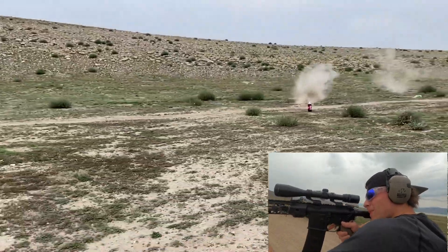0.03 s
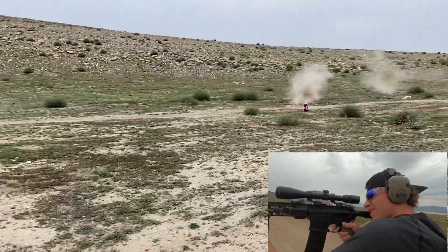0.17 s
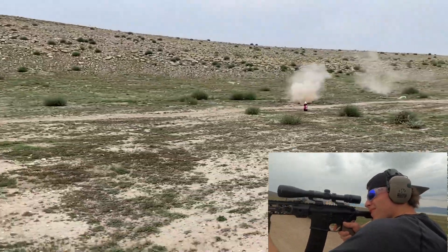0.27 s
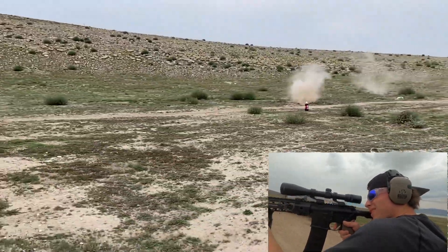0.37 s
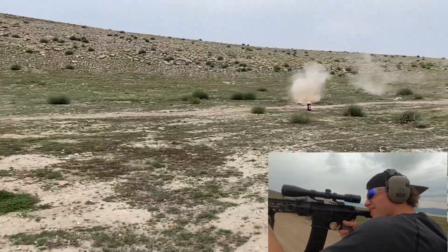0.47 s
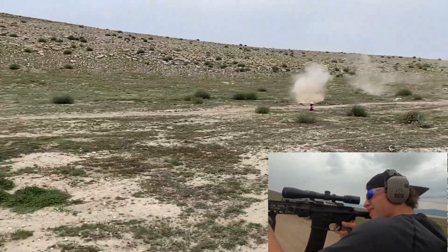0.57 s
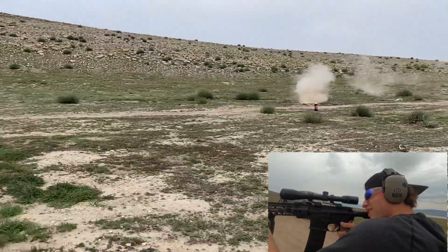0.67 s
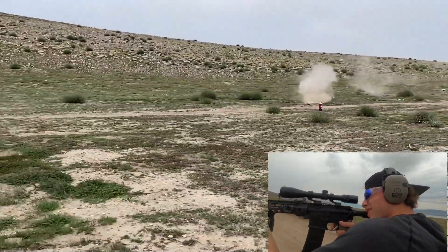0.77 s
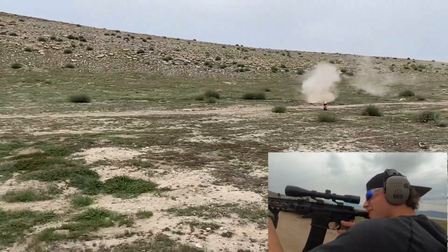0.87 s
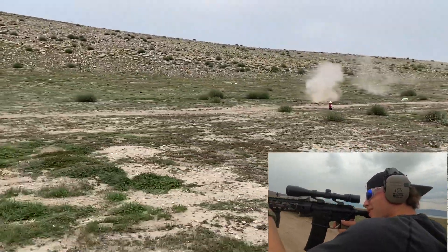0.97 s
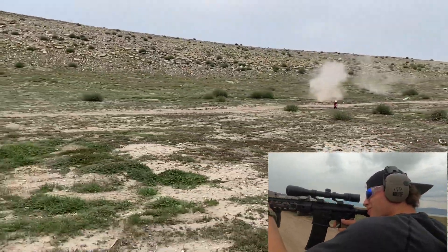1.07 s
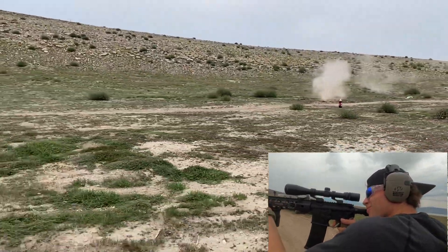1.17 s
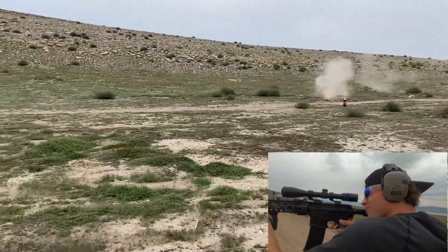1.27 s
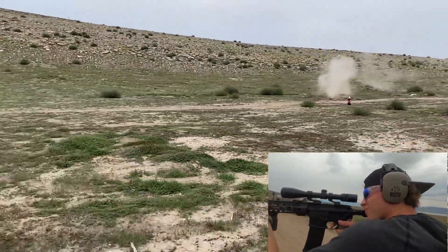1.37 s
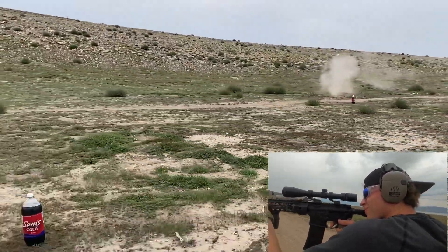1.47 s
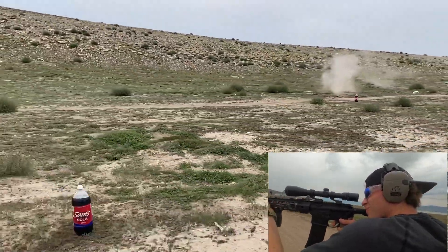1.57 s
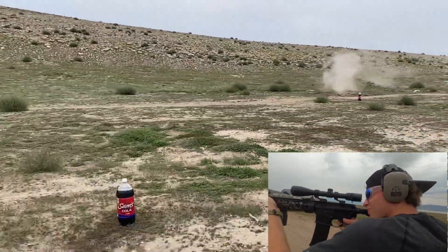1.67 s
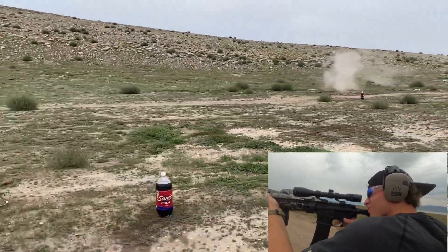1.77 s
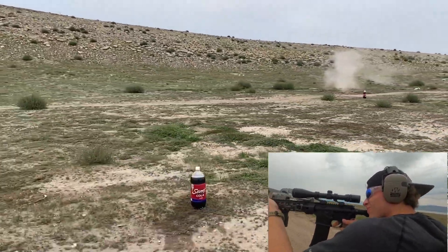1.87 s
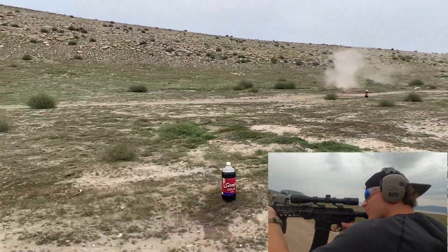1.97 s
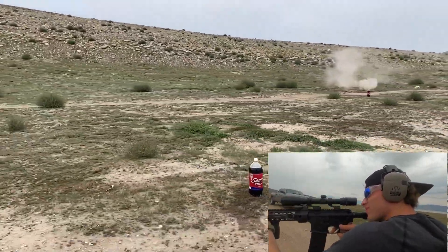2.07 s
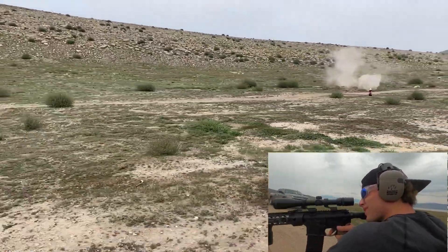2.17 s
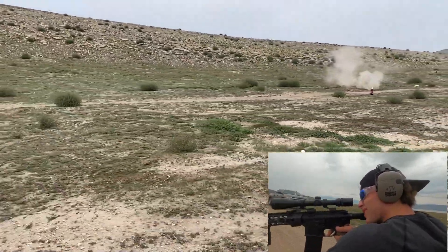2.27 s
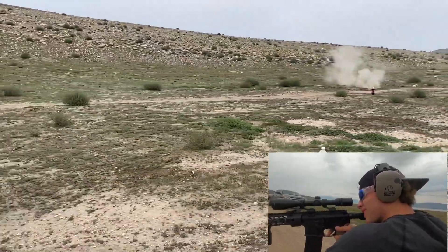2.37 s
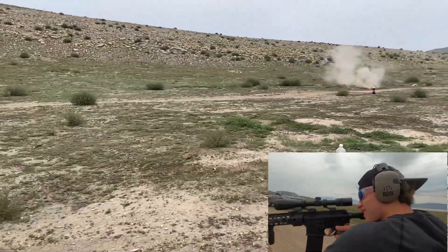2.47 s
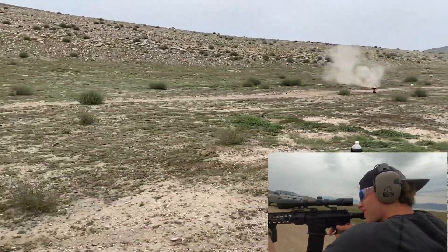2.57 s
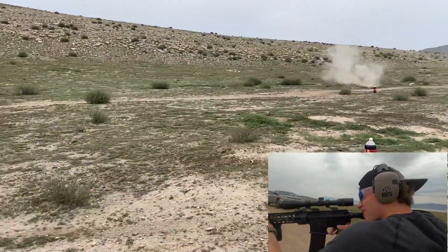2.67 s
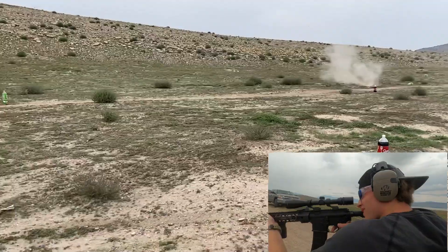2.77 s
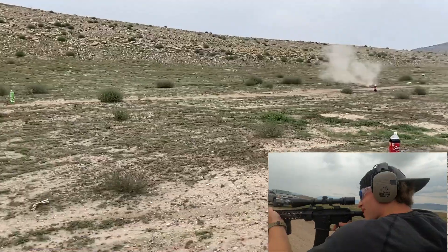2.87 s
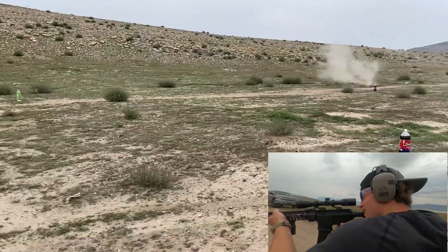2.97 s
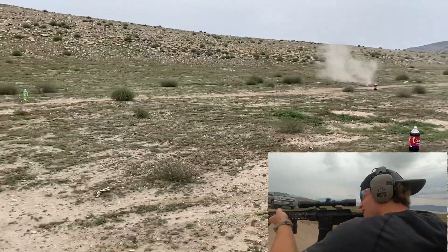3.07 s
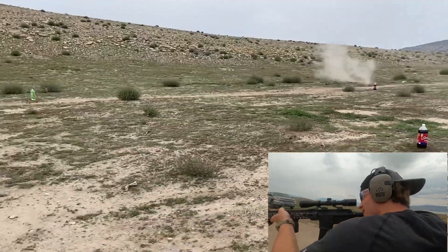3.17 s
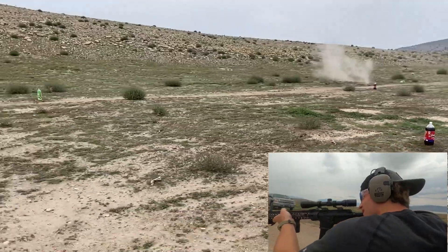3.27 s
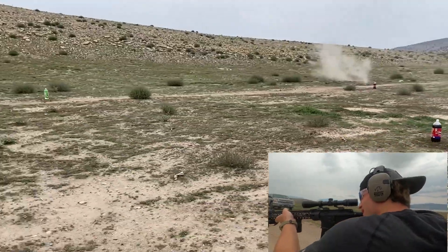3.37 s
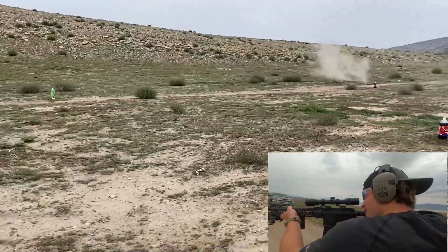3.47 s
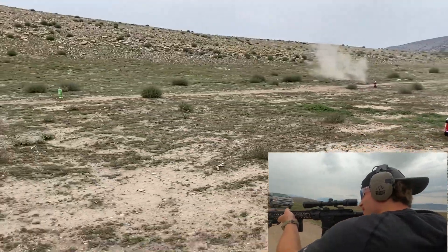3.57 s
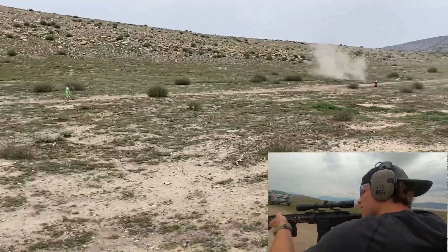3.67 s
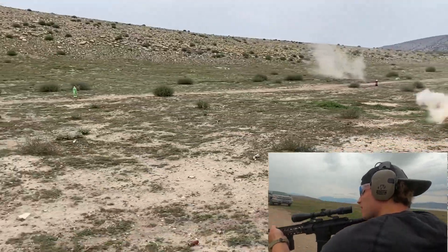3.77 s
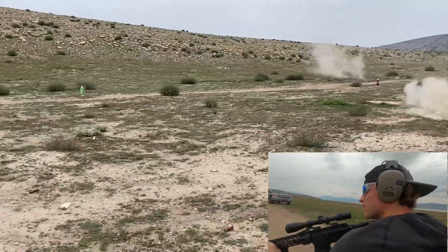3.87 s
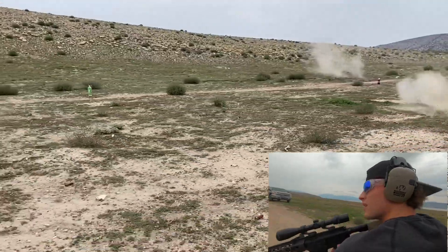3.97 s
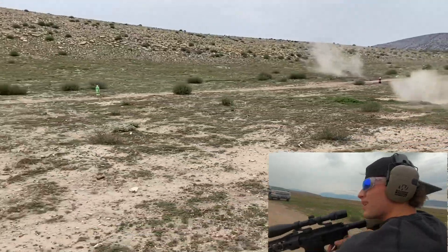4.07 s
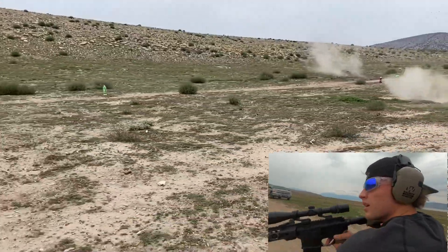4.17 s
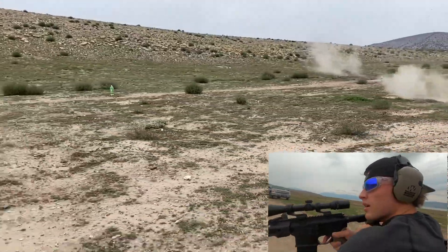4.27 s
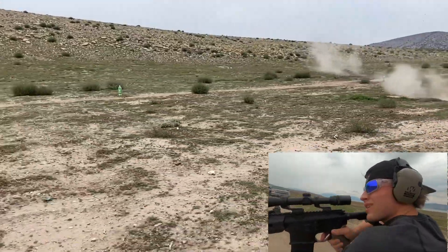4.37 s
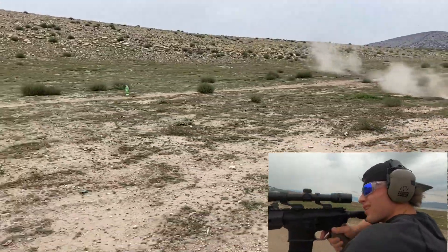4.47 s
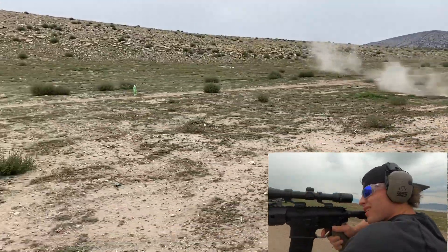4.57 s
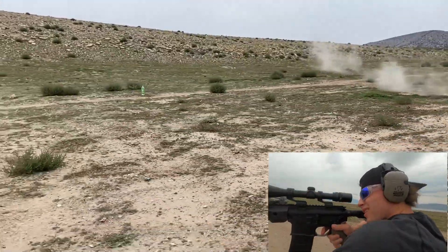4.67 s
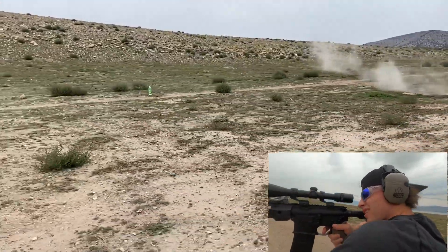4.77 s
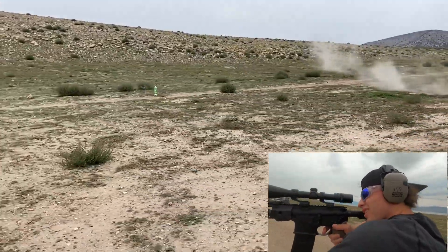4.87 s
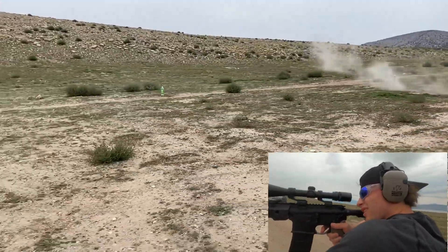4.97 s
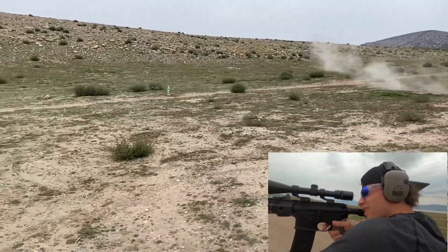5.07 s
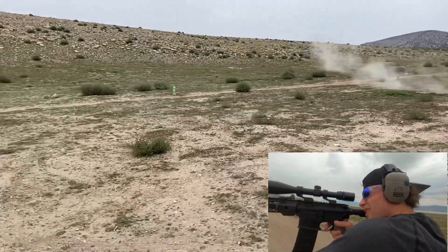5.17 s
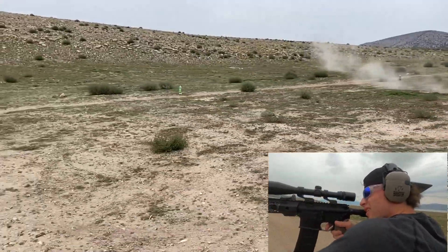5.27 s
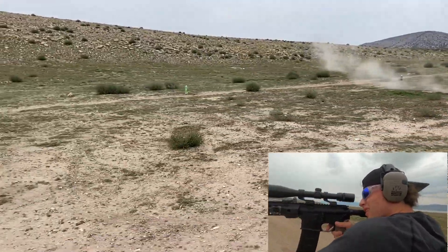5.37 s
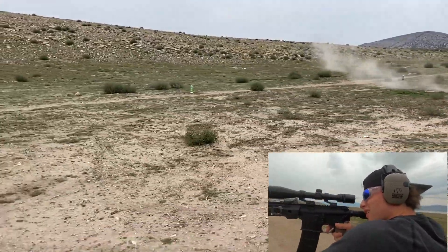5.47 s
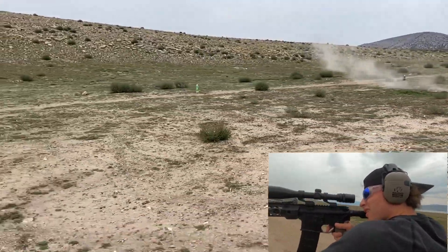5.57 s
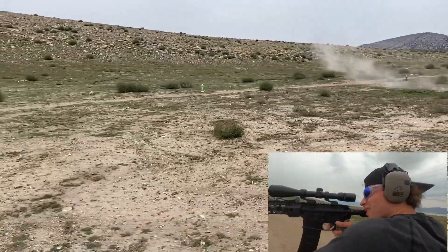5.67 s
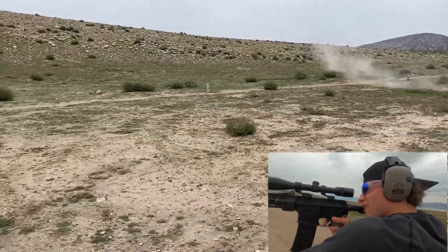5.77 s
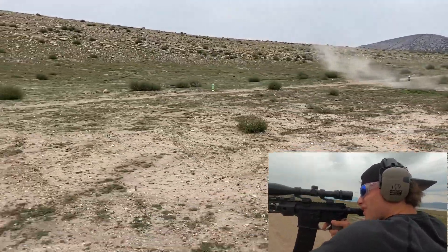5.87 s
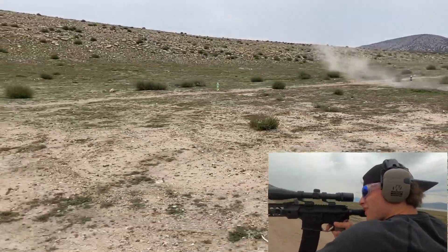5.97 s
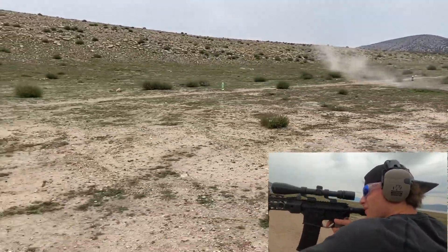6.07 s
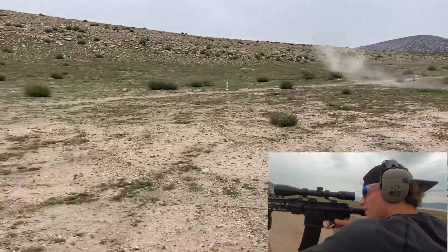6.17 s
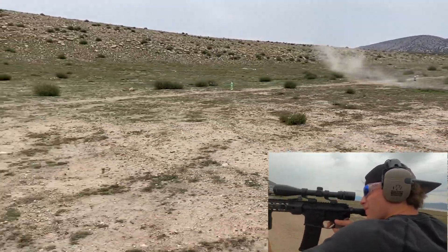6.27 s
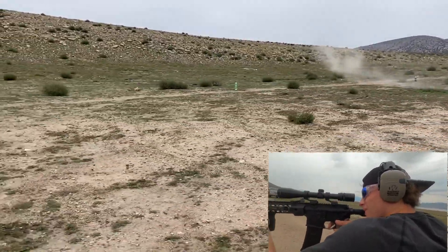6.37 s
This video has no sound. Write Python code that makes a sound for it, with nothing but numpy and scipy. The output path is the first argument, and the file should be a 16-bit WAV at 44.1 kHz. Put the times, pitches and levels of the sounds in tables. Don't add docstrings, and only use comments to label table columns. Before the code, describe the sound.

Sharp, clipped rifle blasts on an open dirt range, each answered by a dulling hillside echo, then light wind buffeting the microphone.

```python
import sys
import numpy as np
from scipy import signal
from scipy.fft import rfft, irfft, next_fast_len
from scipy.io import wavfile
from scipy.ndimage import uniform_filter1d

SR = 44100
rng = np.random.default_rng(int(sys.argv[2]) if len(sys.argv) > 2 else 0)


def dump(signal):
    limited = np.clip(np.atleast_2d(signal).T, -1, 1)
    pcm = np.round(limited * 32767).astype(np.int16)
    wavfile.write(sys.argv[1], SR, pcm)


def natural_amplitude(level_db):
    exponent = np.asarray(level_db, float) / 20
    return 10 ** exponent


N = 283651
T = np.arange(N) / SR
FFT_SIZE = next_fast_len(N)
HZ = np.fft.rfftfreq(FFT_SIZE, 1 / SR) + 1

# t/s, level/dB, first lobe/ms, lobe stretch exponent/1, t60/ms
SHOCK_FRONTS = [
    (.1520, 22, .57, .80, 10),
    (1.9919, 24, .72, .53, 8),
    (3.7534, 12, .24, .97, 8),
    (3.7590, 16, .9, .68, 11.5),
]
JET_LEVELS = [13, 10, 12, -4]

# peak delay/s, swell t60/s, level/dB, fade t60/s, tilt/(dB per octave)
GROUND = [(.004, .03, -11, .095, -.4), (.035, .086, -34.7, .8, 2.3), (.172, .469, -26.3, .459, -1.8)]
ROCK_FACE = [(0.253, 0.117, -27.6, 0.535, 5.2), (0.295, 0.371, -28.0, 1.816, 2.5)]
FAR_SLOPES = [(0.262, 0.214, -16.1, 0.269, -2.2), (0.35, 0.345, -19.3, 0.74, -5.1),
              (0.528, 0.403, -25.7, 1.316, -7.0), (0.612, 2.011, -61.7, 3.279, 7.5),
              (0.86, 0.3, -50.6, 5.572, -7.1)]
# t/s, level/dB, face delay factor/1, slope delay factor/1, near tilt/(dB per octave)
AIMS = [
    (-0.75, -1.3, 1.0, 0.985, -0.0),
    (0.152, -0.7, 1.007, 1.044, 0.4),
    (1.992, -2.2, 0.925, 0.974, 1.6),
    (3.753, -1.6, 1.003, 0.932, -0.1),
]
# t/s, level/dB, tilt/(dB per octave)
OUTCROPS = [(0.01, -37.6, -3.3), (0.315, -28.1, -4.9), (0.398, -19.6, -1.4), (0.434, -12.2, -2.9),
            (0.52, -30.8, 1.5), (0.7, -33.6, -6.3), (0.835, -35.4, -4.0), (2.135, -33.8, 2.1),
            (2.225, -36.2, 2.8), (2.258, -9.0, -6.0), (2.305, -13.9, -1.6), (2.41, -24.1, -2.6),
            (2.53, -33.3, -1.2), (2.84, -37.6, -7.6), (2.94, -47.9, -4.4), (3.92, -39.8, 1.5),
            (4.022, -8.7, -5.4), (4.075, -14.7, -1.1), (4.25, -34.5, -3.1), (4.3, -21.3, -8.1),
            (4.456, -31.0, -3.4)]
# f/Hz, level/(dB per Hz)
HILL_SPECTRUM = [(35.0, -52.0), (70.0, -23.0), (140.0, -6.6), (200.0, -4.2), (280.0, -1.8), (400.0, -3.7),
                 (600.0, -10.8), (850.0, -17.0), (1250.0, -17.2), (2000.0, -23.7), (3500.0, -28.9),
                 (7000.0, -41.7), (12000.0, -54.5), (16000.0, -62.5)]

# t/s, f/Hz, level/dB
BULLET_WHINE = [
    (2.08, 1920, -62),
    (2.14, 2045, -45),
    (2.2, 2110, -45),
    (2.42, 2345, -54),
    (2.52, 2295, -56),
    (2.7, 1990, -60),
    (2.92, 1580, -65),
    (2.97, 1510, -74),
    (3.15, 1300, -78),
]
# t/s, peak level/dB, f/Hz, t60/s
GRIT_TICKS = [(.2344, -42, 7000, .012), (.3194, -46, 7000, 0.013), (0.739, -48, 3480, 0.011),
              (.8894, -52, 4500, .012), (.9358, -50, 4500, .012), (.9637, -46, 3800, .015),
              (2.793, -45, 3970, .02), (3.9151, -45, 7000, 0.013), (3.9265, -47, 8000, .012),
              (4.2877, -37, 3970, 0.01)]
# t/s, peak
# level/dB, f/Hz, t60/s
KNOCKS_AND_MURMURS = [(.391, -14, 600, 0.045), (4.565, -46, 2500, 0.045), (1.199, -49.5, 1150, 0.03),
                      (1.359, -48, 900, 0.054), (1.629, -50.5, 1150, .03), (4.45, -48, 2800, 0.056),
                      (1.55, -45, 175, .7), (1.2, -55, 1050, 1.1), (1.55, -56, 1050, 1.1), (3.33, -60, 700, .6),
                      (4.456, -40, 795, 0.053), (5.1, -42, 394, 0.025), (5.634, -53, 650, 0.073),
                      (5.685, -47, 800, 0.045), (5.875, -42.5, 340, .05), (5.884, -50, 1030, 0.1),
                      (5.934, -58, 650, 0.04)]
# t/s, f/Hz, level/dB, t60/s
BRASS_RINGS = [
    (.814, 11343, -59, 0.44),
    (.814, 15019, -56, .3),
    (3.915, 8100, -54, 0.11),
    (.32, 5900, -48.5, 0.038),
]
# t/s, peak level/dB, f/Hz, t60/s
GUST_SLAPS = [(5.329, -41.5, 61, 0.11), (5.871, -36.5, 51.1, 0.13), (5.931, -38, 59.2, 0.069),
              (5.994, -37, 68, 0.11), (6.039, -38, 72, 0.12), (6.1, -44.5, 89, 0.12),
              (6.168, -38, 90.5, 0.19), (6.269, -41.5, 53.8, 0.15)]

# t/s, level/dB
WIND_STRENGTH = [(0, -55), (.3, -68), (.42, -55), (.7, -64), (1.0, -59), (1.28, -65), (1.65, -62),
                 (2.2, -72), (2.8, -58), (3.45, -65), (3.65, -53), (3.87, -76), (4.2, -53), (4.8, -61),
                 (5.3, -53), (5.6, -61), (6.0, -47), (6.43, -53)]
# f/Hz, level/(dB per Hz)
GUST_SPECTRUM = [(15, -12.5), (30, -3.5), (60, 1.5), (90, -1.5), (150, -8.5), (220, -22), (400, -60)]
# f/Hz, level/(dB per Hz)
FLOOR_SPECTRUM = [(60, -14), (100, -4), (160, 4), (230, -8), (350, -15.5), (600, -20.5), (1000, -22.5),
                  (1600, -28.5), (3000, -28), (9000, -31), (16000, -28.5)]


def blast():
    gas_hz, gas_width_hz, gas_t60_s = 1900, 2600, .00823
    edges = [max(gas_hz - gas_width_hz / 2, 200), gas_hz + gas_width_hz / 2]
    gas_band = signal.butter(1, edges, "band", fs=SR, output="sos")
    out = np.zeros(N)
    t = T[:SR // 10]
    for (s, db, lobe_ms, stretch, t60_ms), jet_db in zip(SHOCK_FRONTS, JET_LEVELS):
        turns = (t * 1000 / lobe_ms) ** stretch
        front = -natural_amplitude(db) * np.sin(np.pi * turns) * fade(t, t60_ms / 1000)
        jet = signal.sosfilt(gas_band, rng.standard_normal(len(t))) * fade(t - .0004, gas_t60_s)
        i = int(s * SR)
        out[i:i + len(t)] += front + natural_amplitude(jet_db) * 2.3 * jet
    return out


def roll(grain_db=1.48, flicker_db=1.9, lumps_db=1.1):
    grain = grain_db * rng.exponential(size=N) + walk(60)
    clicks = rng.standard_normal(N) * natural_amplitude(grain)
    spectrum = rfft(colour(clicks, HILL_SPECTRUM), FFT_SIZE)
    out = 0
    lumps = walk(30)
    for octave in np.arange(5.5, 14.1, .5):
        overlap = np.clip(1 - 2 * np.abs(np.log2(HZ) - octave), 0, 1)
        band = irfft(spectrum * overlap, FFT_SIZE)[:N]
        out = out + band * land(2 ** octave) * natural_amplitude(flicker_db * walk(25) + lumps_db * lumps)
    return out


def land(hz):
    ridge_s, ridge_t60_s = .415, .36
    outcrop_swell_s, outcrop_t60_s = .09, .13
    air_db_per_s = 47 * (hz / 10 ** 4) ** 1.39
    octaves = max(np.log2(hz / 250), 0)
    clock = T[::64]
    power = 0
    for s, db, face_late, slope_late, tilt in AIMS:
        t = clock - s
        air_db = db - air_db_per_s * np.maximum(t, 0)
        ridge = fade(np.maximum(t - ridge_s * face_late, 0), ridge_t60_s)
        places = [(GROUND, 1, tilt, 1), (ROCK_FACE, face_late, tilt, ridge), (FAR_SLOPES, slope_late, 0, 1)]
        for rows, late, aim_tilt, gain in places:
            for delay, swell, row_db, t60, row_tilt in rows:
                u = t - delay * late
                shape = (t > 0) * fade(np.abs(u), np.where(u < 0, swell, t60))
                level_db = air_db + row_db + (aim_tilt + row_tilt) * octaves
                power = power + (natural_amplitude(level_db) * gain * shape) ** 2
    for s, db, tilt in OUTCROPS:
        shape = fade(np.abs(clock - s), np.where(clock < s, outcrop_swell_s, outcrop_t60_s))
        power = power + (natural_amplitude(db + tilt * octaves) * shape) ** 2
    return np.interp(T, clock, np.sqrt(power))


def whine():
    hz, db = curve(BULLET_WHINE)
    on = (T > BULLET_WHINE[0][0]) & (T < BULLET_WHINE[-1][0])
    phase = 2 * np.pi * np.cumsum(hz * (1 + .004 * walk(70))) / SR
    near = np.exp(-((T - 2.5) / .12) ** 2)
    tone = np.sin(phase) + natural_amplitude(-3) * near * np.sin(3 * phase / 2)
    return np.sqrt(2) * on * tone * natural_amplitude(db - 3 + 2.5 * walk(30))


def debris():
    out = np.zeros(N + SR)
    t = T[:SR // 2]
    for s, db, hz, t60 in list(GRIT_TICKS) + list(KNOCKS_AND_MURMURS) + list(GUST_SLAPS):
        band = signal.butter(2, [hz / 1.6, hz * 1.7], "band", fs=SR, output="sos")
        attack = np.minimum(t / (0.057 * t60), 1)
        touch = signal.sosfilt(band, rng.standard_normal(len(t)) * fade(t, t60) * attack)
        i = int(s * SR)
        out[i:i + len(t)] += natural_amplitude(db) * touch / np.abs(touch).max()
    for s, hz, db, t60 in BRASS_RINGS:
        out[:N] += natural_amplitude(db) * np.sin(2 * np.pi * hz * T) * fade(T - s, t60)
    return out[:N]


def wind():
    level_db = curve(WIND_STRENGTH)[0] + 2.6 + 2.8 * walk(18) + 3 * walk(6)
    return colour(rng.standard_normal(N), GUST_SPECTRUM) * natural_amplitude(level_db)


def floor():
    floor_db, side_db, duck_db, duck_s = -53, -62.5, -12.5, .24
    duck = sum((T > s) * np.clip(1.5 - ((T - s) / duck_s) ** 3, 0, 1) for s, *_ in SHOCK_FRONTS[:3])
    side_spectrum = [(100, -13.5), (1000, -1), (5000, -1), (16000, -3.0)]  # f/Hz, level/(dB per Hz)
    mid = colour(rng.standard_normal(N), FLOOR_SPECTRUM) * natural_amplitude(floor_db)
    side = colour(rng.standard_normal(N), side_spectrum) * natural_amplitude(side_db)
    return natural_amplitude(duck_db * duck) * (mid + side * np.array([[1], [-1]]))


def colour(x, shape):
    hz, db = np.transpose(shape)
    gain = natural_amplitude(np.interp(np.log(HZ), np.log(hz), db, left=-90))
    y = irfft(rfft(x, FFT_SIZE) * gain, FFT_SIZE)[:N]
    return y / np.std(y)


def walk(rate):
    k = int(SR / rate)
    held = np.repeat(rng.standard_normal(N // k + 1), k)
    return 0.98 * uniform_filter1d(uniform_filter1d(held, k), k)[:N]


def fade(t, t60):
    return (t >= 0) * np.exp(-np.log(1000) * np.maximum(t, 0) / t60)


def curve(table):
    s, *columns = np.transpose(table)
    return [np.interp(T, s, c) for c in columns]


def scene():
    return blast() + roll() + whine() + debris() + wind() + floor()


def low_pass(x):
    return signal.sosfilt(signal.butter(12, 16270, fs=SR, output="sos"), x)


def record(dry):
    flat = dry / (1 + np.abs(dry) ** 6) ** (1 / 6)
    flat = signal.sosfilt(signal.butter(1, 28, "high", fs=SR, output="sos"), flat)
    flat = signal.sosfilt(signal.ellip(8, .2, 50, 15700, fs=SR, output="sos"), flat)
    return low_pass(np.clip(flat, -1, 1))


dry = scene()
out = record(dry)
dump(out)
```